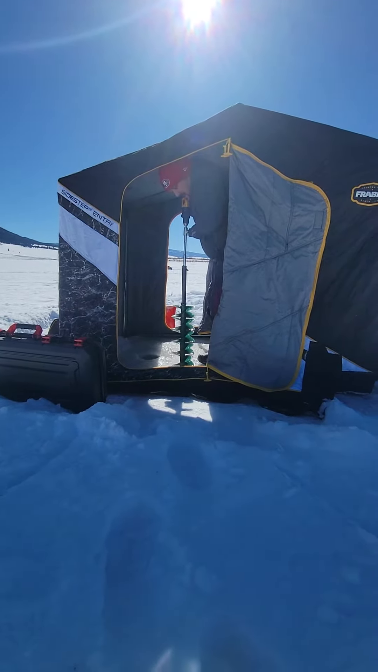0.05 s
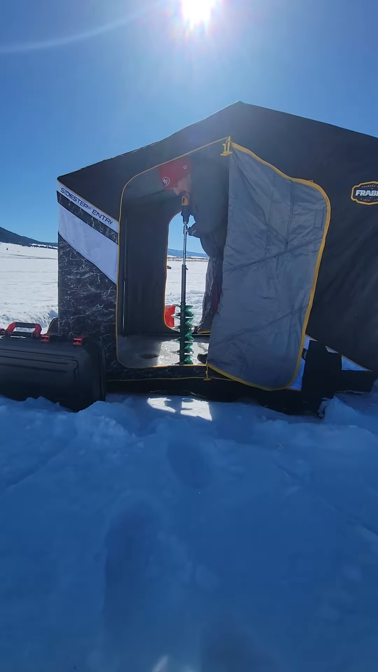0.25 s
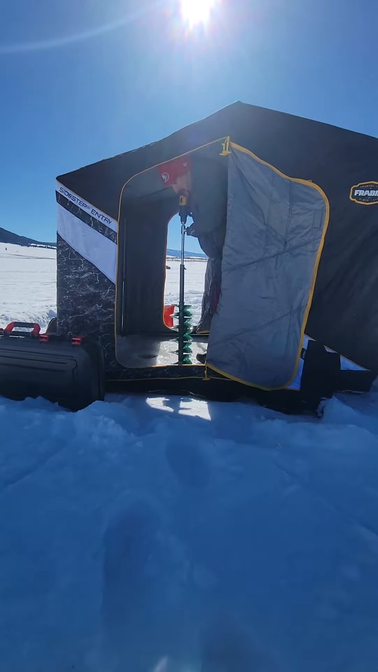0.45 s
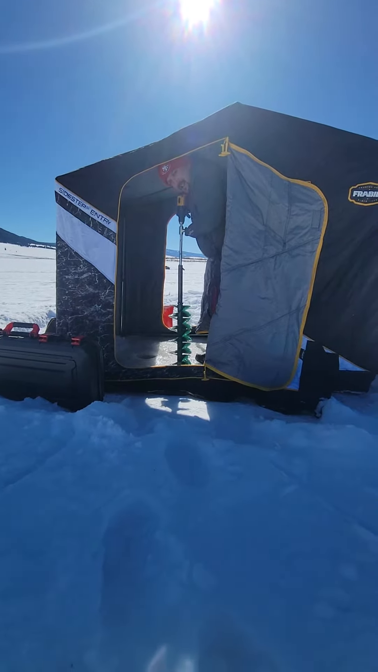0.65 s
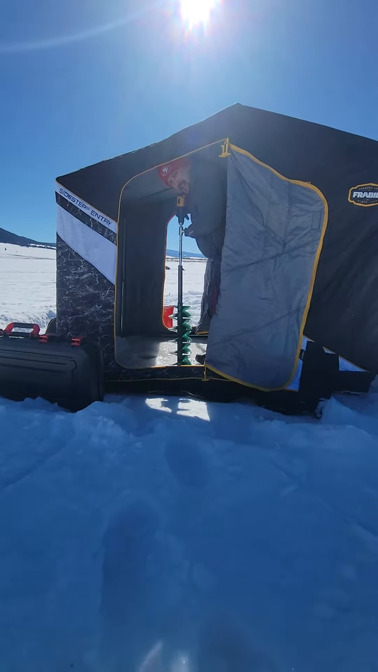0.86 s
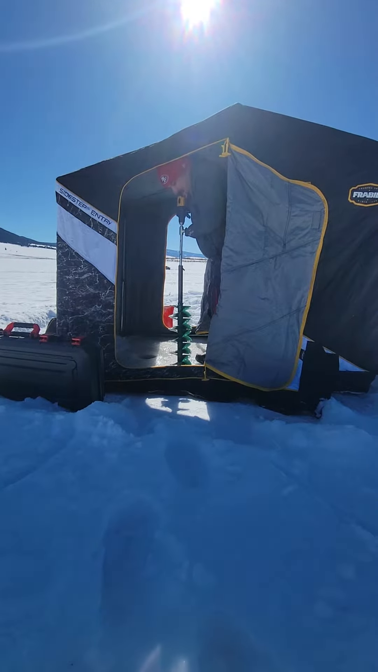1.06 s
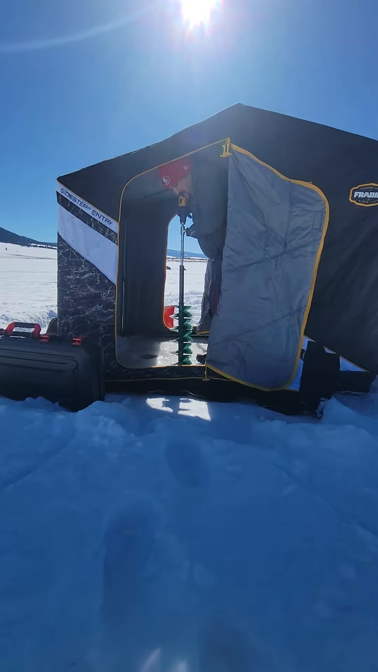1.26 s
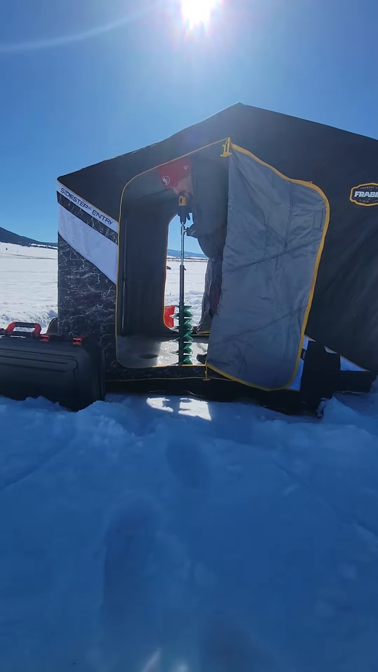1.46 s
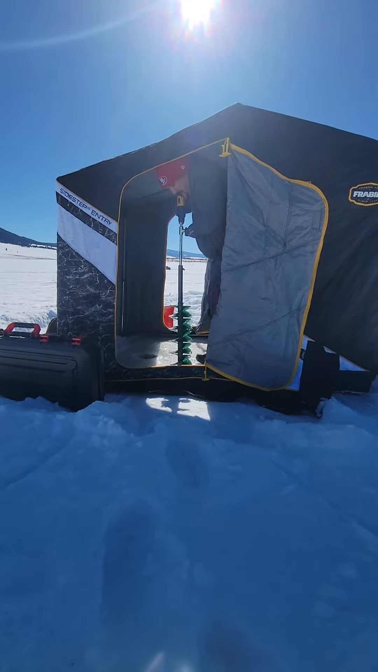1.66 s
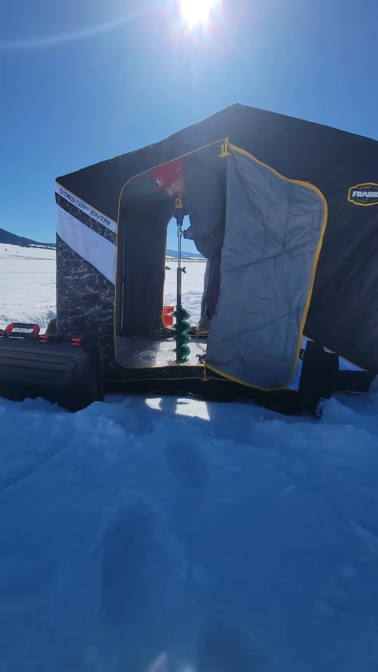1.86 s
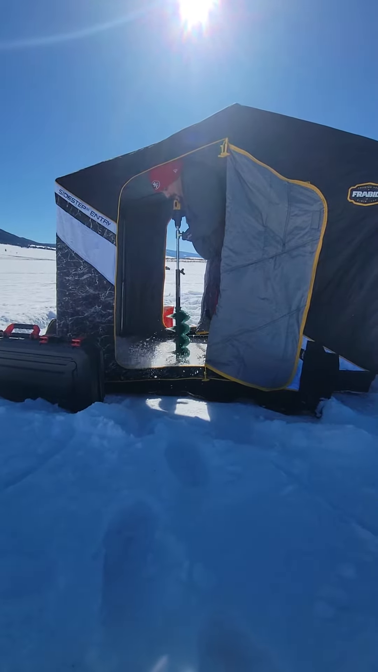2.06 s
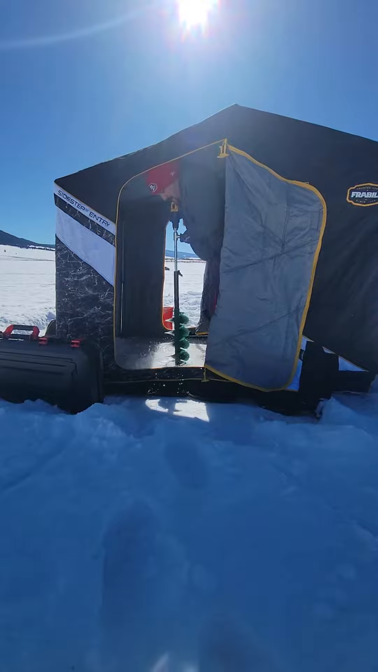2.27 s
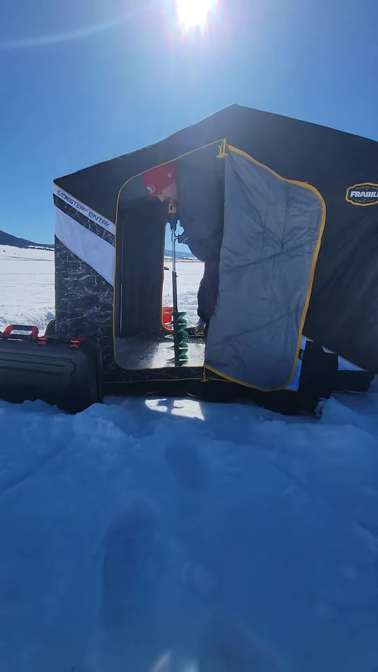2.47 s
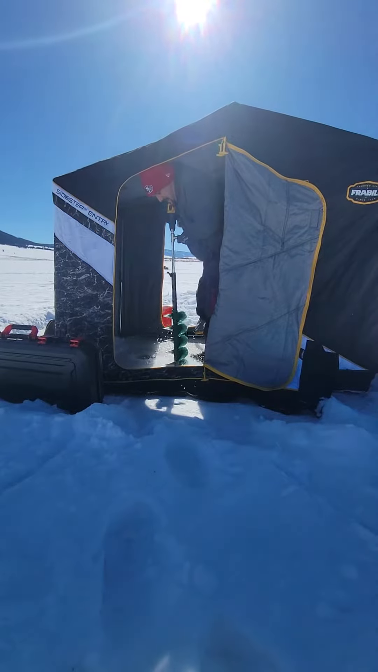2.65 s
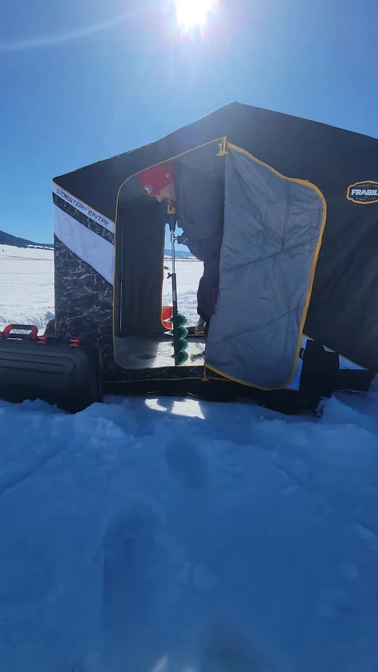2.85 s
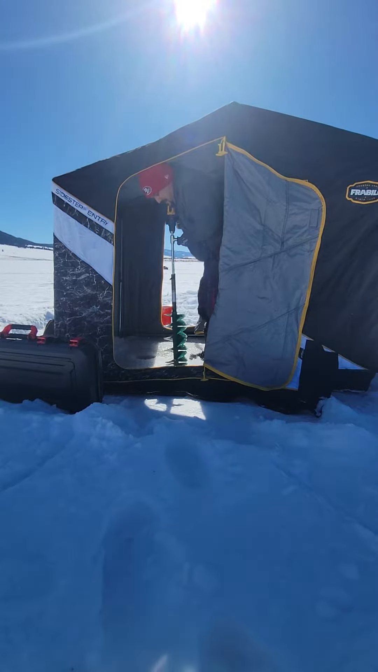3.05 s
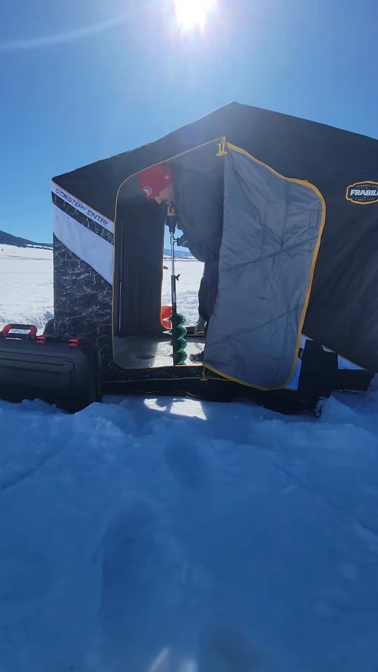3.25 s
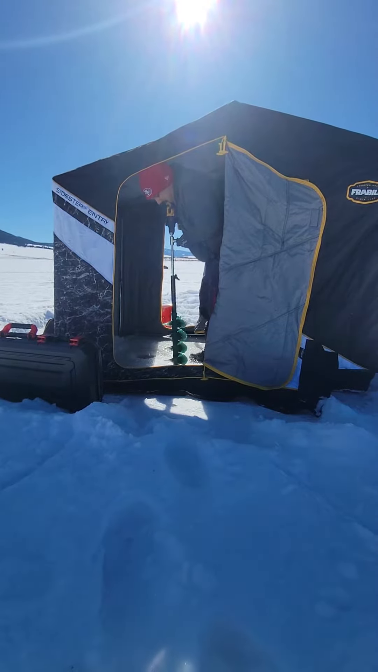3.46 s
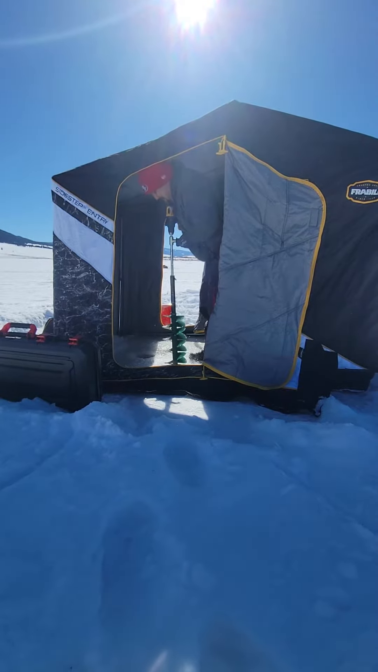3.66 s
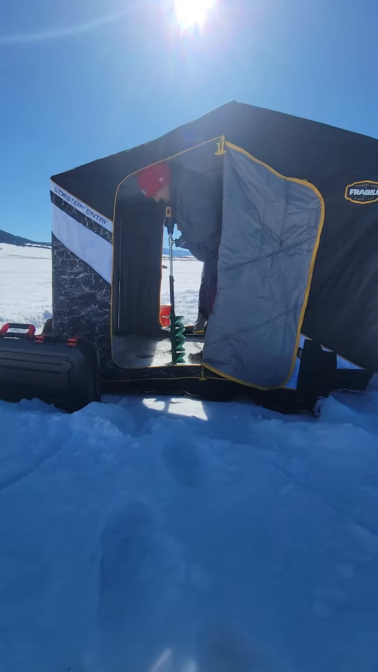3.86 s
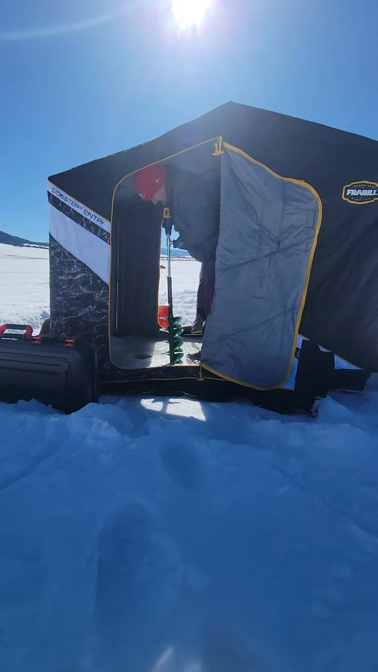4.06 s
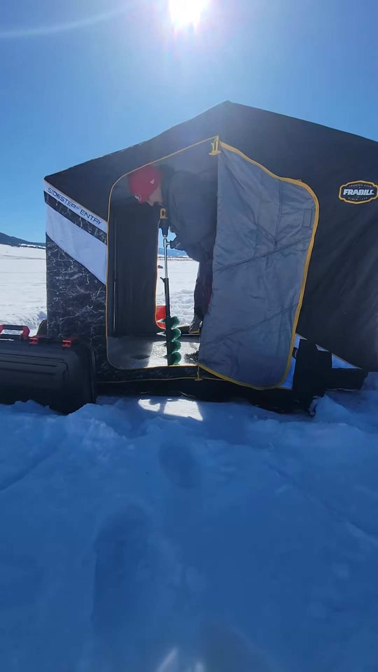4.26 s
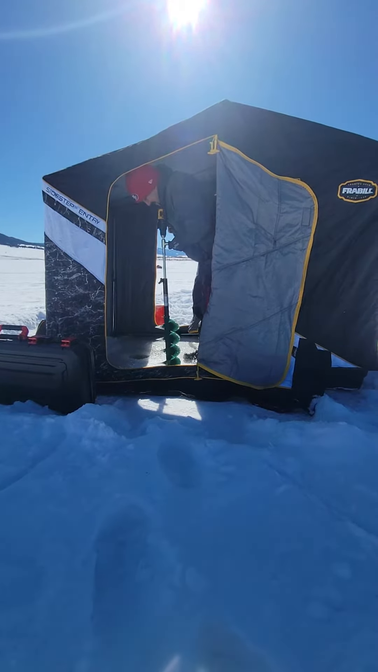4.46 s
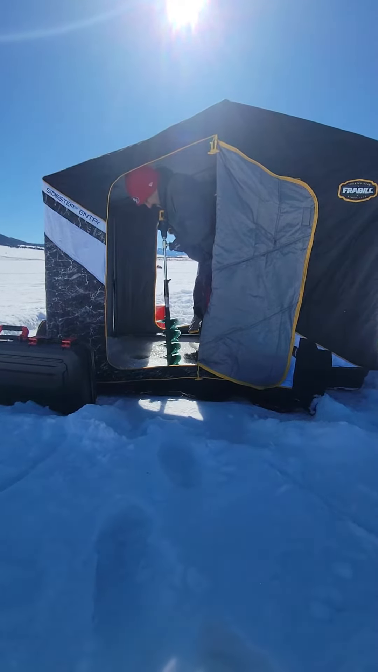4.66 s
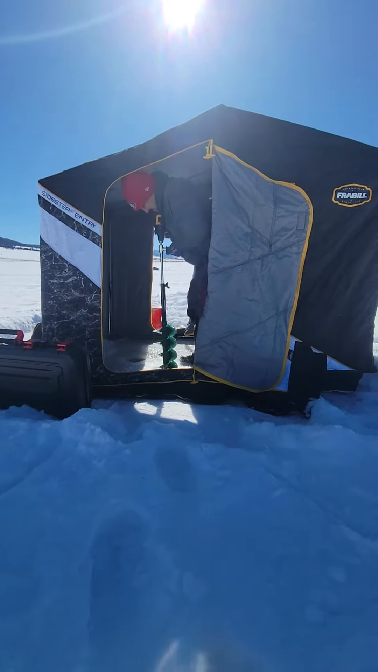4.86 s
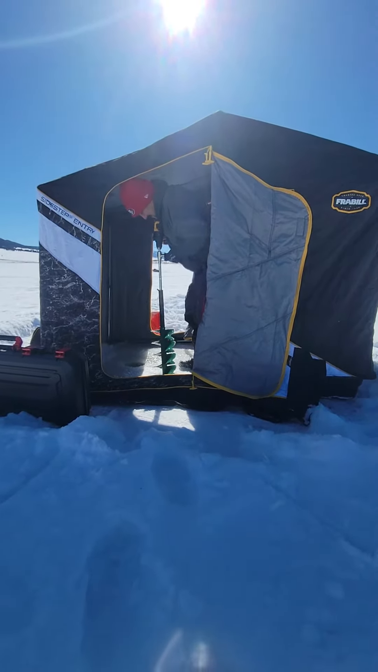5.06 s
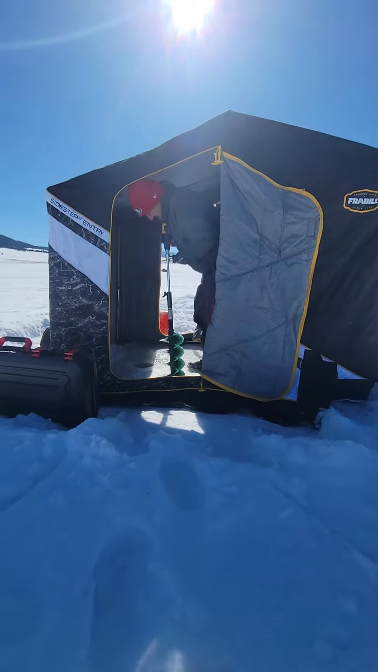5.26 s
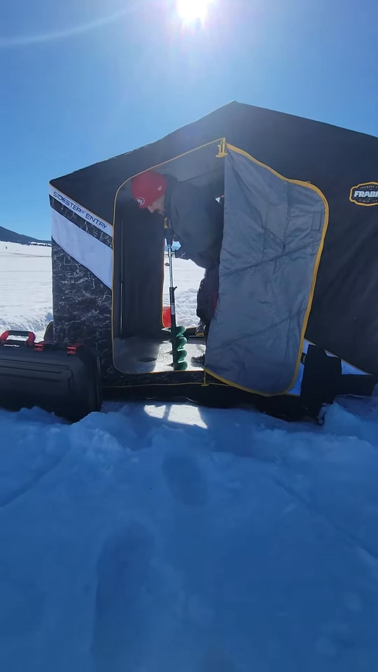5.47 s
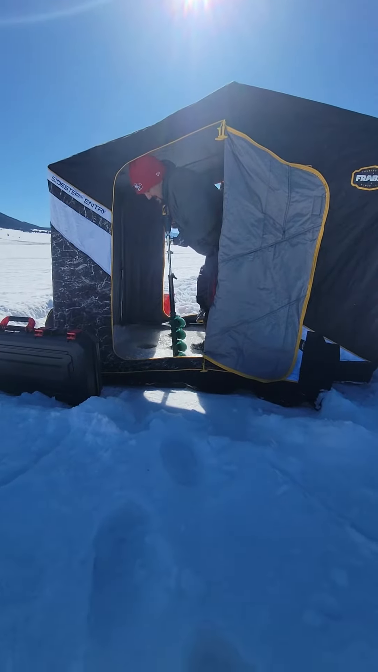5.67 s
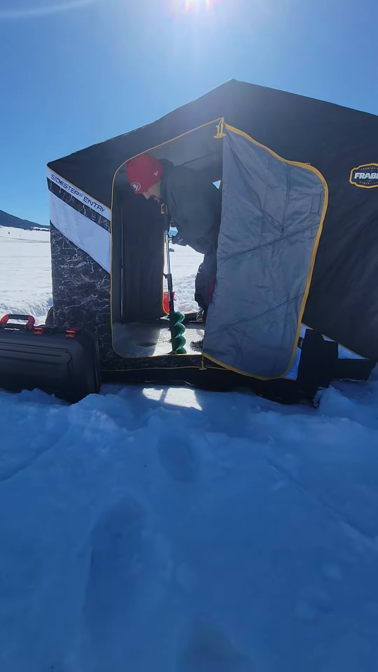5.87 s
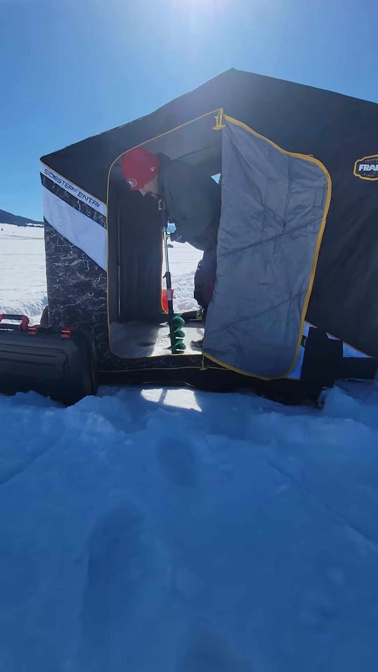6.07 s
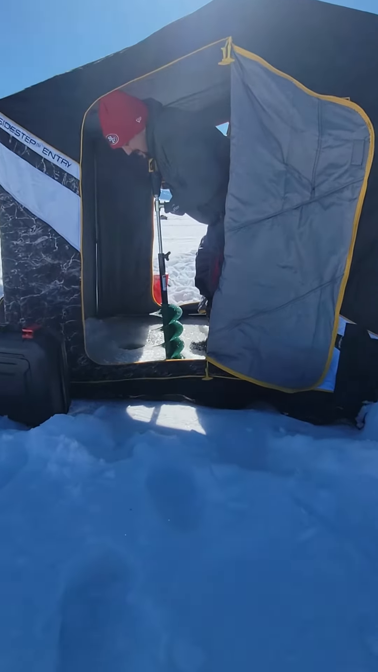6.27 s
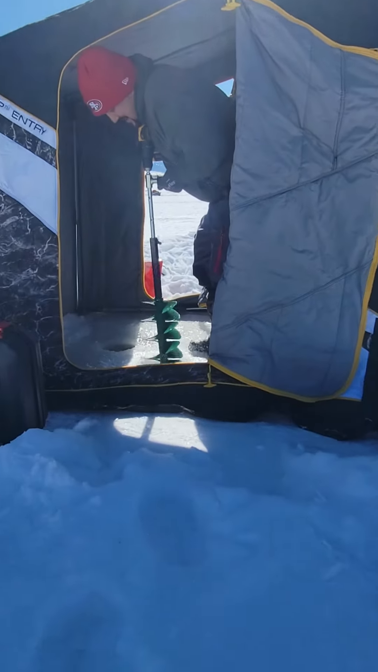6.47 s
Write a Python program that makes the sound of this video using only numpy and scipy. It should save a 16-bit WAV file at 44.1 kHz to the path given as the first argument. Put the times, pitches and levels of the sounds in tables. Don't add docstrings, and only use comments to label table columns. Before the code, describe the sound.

After a second and a half of faint outdoor roar, a drill's gear whine starts and its auger grinds through ice with uneven catches and thuds.

```python
import sys
import numpy as np
from scipy import signal
from scipy.fft import rfft, irfft
from scipy.io import wavfile
from scipy.ndimage import uniform_filter1d

SR = 44100
rng = np.random.default_rng(int(sys.argv[2]) if len(sys.argv) > 2 else 0)


def wrap_up_sound(samples):
    columns = np.atleast_2d(samples).T
    tamed = np.clip(columns, -1, 1)
    steps = np.round(tamed * 32767).astype(np.int16)
    wavfile.write(sys.argv[1], SR, steps)


def to_linear_factor(level_db):
    exponent = np.asarray(level_db, float) / 20
    return 10 ** exponent


N = 287532

TRIGGER_S = 1.569

# start_s [s], pitch_hz [Hz]
TOOTH_RATE = [(1.625, 3700), (1.668, 3250), (1.705, 4900), (1.74, 5010), (1.82, 4230), (1.913, 3690),
              (1.98, 3680), (2.05, 3410), (2.4, 3270), (3.39, 2960), (3.55, 3320), (3.71, 3330),
              (3.85, 3680), (4.14, 3370), (4.3, 2900), (5.03, 2860), (5.12, 2610), (6.05, 2740)]
# start_s [s], speed_lost [share]
STALLS = [(2.444, .04), (2.6, .03), (2.7, .03), (3.228, .06), (4.336, .06), (4.54, .04), (4.75, .05),
          (5.065, .04), (5.123, .03), (5.436, .07), (5.575, .05), (5.7, .06), (5.92, .06), (6.2, .02),
          (6.39, .03), (6.52, .04)]
# tooth_rate_multiple [ratio], level_db [dB], fuzz_width_hz [Hz], fuzz_share [ratio]
TOOTH_LINES = [(.62, 3, 30, .3), (.965, 0, 30, .35), (1.047, 6, 30, .35), (1.02, -19, 160, 3),
               (2, 0, 150, 1.3), (3, -5, 170, 1.2), (4, -4, 200, 1.2), (5, -16, 250, 1.2)]
# pitch_hz [Hz], level_db [dB per Hz]
HOUSING = [(4500, -18), (5300, -8), (5900, -8), (6600, 4), (7300, 0), (7900, -3.5), (8600, -7), (9400, -7),
           (10300, -6.5), (11000, -15.5), (11600, -21), (13000, -28), (15000, -15)]
# start_s [s], level_db [dB]
WHINE = [(1.59, -68), (1.62, -54), (1.67, -46), (1.71, -36), (1.78, -31), (1.86, -30), (1.91, -34),
         (1.96, -43), (2.45, -32), (3.4, -34), (3.6, -32), (3.85, -34), (4.0, -37), (4.2, -34), (4.4, -36),
         (5.2, -39)]
# start_s [s], downward_pressure_db [dB], tooth_clatter_db [dB]
EFFORT = [(1.66, -16, -69), (1.72, -8.5, -54), (1.885, -4, -48), (1.925, -5, -31), (2.1, -3.5, -30),
          (2.4, -2.5, -34), (2.6, 0, -40), (3.39, 1.5, -40), (3.55, -2, -32), (3.72, -5, -33),
          (3.87, -12, -32), (4.13, -2, -32), (4.28, 1, -32), (5.0, -0.5, -29), (5.2, -1, -34),
          (6.5, -1, -33)]
CASE_HZ, CASE_WIDTH_HZ = {.62: 3050, 1.047: 3870}, 170


def gears():
    stalled = sum(lost * bump(s, .022) for s, lost in STALLS)
    tooth_hz = curve(TOOTH_RATE) * (1 - stalled + .003 * wander(39.4))
    turns = np.cumsum(tooth_hz) / SR
    planets = 1 + 0.049 * np.cos(2 * np.pi * turns / 72)
    tooth, overtones = np.zeros((2, N))
    for k, db, width_hz, fuzz in TOOTH_LINES:
        smoother = signal.butter(2, width_hz, fs=SR, output="sos")
        uneven = evened(signal.sosfilt(smoother, rng.standard_normal((2, N))))
        phase = 2 * np.pi * k * turns
        line = to_linear_factor(db) * ((1 + fuzz * uneven[0]) * np.cos(phase) + fuzz * uneven[1] * np.sin(phase))
        if k in CASE_HZ:
            line = line / (1 + ((k * tooth_hz - CASE_HZ[k]) / CASE_WIDTH_HZ) ** 2)
        if k < 2:
            tooth = tooth + line
        else:
            overtones = overtones + line
    squeezed = np.clip((np.arange(N) / SR - TRIGGER_S) / 0.062, 0, 1)
    whine = to_linear_factor(curve(WHINE)) * tooth
    clatter = to_linear_factor(curve(EFFORT, order=2)) * colour(overtones, HOUSING)
    return squeezed * planets * (whine + clatter)


def running():
    t = np.maximum(np.arange(N) / SR - TRIGGER_S, 0)
    return np.minimum(t / .05, 1) * to_linear_factor(-41 * np.exp(-t / .09))


# pitch_hz [Hz], width_hz [Hz], level_db [dB]
AUGER = [(1460, 143, -10.5), (1953, 130, -16.5), (2580, 400, -20), (3097, 93, -11.5), (3816, 370, -8)]
# pitch_hz [Hz], level_db [dB per Hz]
SHAVED_ICE = [(500, -40), (1200, -8.5), (1600, -13), (2000, -4), (2500, -1), (3100, -1.5), (3800, -11),
              (4800, -9.5), (5800, -4), (6600, -3), (7600, -11), (8200, -33.5), (10000, -31)]
# pitch_hz [Hz], level_db [dB per Hz]
CRUSHED_ICE = [(60, -15), (150, -12.5), (330, -22), (500, -6), (800, -1), (1000, -4.5), (1150, -2.5),
               (1400, -6.5), (1700, -23), (2500, -7.5), (4000, -63), (8000, -50)]
# pitch_hz [Hz], level_db [dB per Hz]
FLYING_CHIPS = [(6000, -6.5), (7800, 7.5), (8300, -3), (9300, -8), (10200, -8), (11400, -11), (12500, -2.5),
                (14500, -17), (15600, 1), (15900, -50)]
RASP_DB, CRUSH_DB, CHIPS_DB = -20, -34, -41.5


def blades():
    chatter, cuts = wander(36), grains(5000, 1.8, 1.0)
    pressure, caught, depth = curve(EFFORT), bite(), depth_db()

    ringing = sum(to_linear_factor(db) * evened(resonate(cuts, hz, width)) for hz, width, db in AUGER)
    shaved = evened(colour(cuts, SHAVED_ICE) + to_linear_factor(0.21 * depth) * ringing)
    rasp = to_linear_factor(RASP_DB + 0.46 * pressure + depth + 0.22 * caught + 0.78 * chatter) * shaved

    crushed = colour(grains(1500, 2.2, 0.82), CRUSHED_ICE)
    crush = to_linear_factor(CRUSH_DB + pressure + 1.43 * caught + 0.62 * chatter) * crushed

    flurry = 2.2 * wander(6.2) + 0.36 * chatter
    chips_level = CHIPS_DB + 0.1 * depth + 0.12 * pressure - 0.4 * caught + flurry
    chips = to_linear_factor(chips_level) * colour(grains(5500, 2.4, 0.44), FLYING_CHIPS)
    return rasp + crush + chips


def depth_db():
    sinking_s = np.maximum(np.arange(N) / SR - 2.286, 0)
    return -12.5 * (1 - np.exp(-sinking_s / 1.9))


# start_s [s], thud_db [dB], bite_db [dB]
CATCHES = [(2.247, -49, -1), (2.44, -48, 1.5), (2.558, -48, 1.5), (2.62, -41, -1.5), (2.735, -54, 1),
           (2.873, -41, 1.3), (3.127, -37, 1.4), (3.252, -64, 1), (3.356, -48, 2), (3.605, -55, 1),
           (3.737, -73, 1.5), (4.143, -69, -0.5), (4.261, -40, 1.5), (4.399, -47, 1), (4.59, -41, 1),
           (4.741, -51, 1.5), (4.855, -46, 1), (4.995, -44, 2), (5.141, -48, 2), (5.29, -55, 2.5),
           (5.41, -46, 2.5), (5.567, -45, 3), (5.71, -46, 3), (5.819, -48, 1.8), (5.963, -43, 3),
           (6.163, -51, 1), (6.259, -49, 2), (6.39, -42, 3.1), (6.5, -47, 2.5)]


def bite():
    return sum(db * bump(s, .03) for s, _, db in CATCHES)


def sheet():
    mode_hz, t60_s, hum_db, thud_early_s = 218.5, 0.19, -54, .025
    t, push = np.arange(6000) / SR, np.zeros(N)
    for s, db, _ in CATCHES:
        push[round((s - thud_early_s) * SR)] = to_linear_factor(db)
    swell = (1 - np.exp(-t / 0.0017)) * to_linear_factor(-60 * t / t60_s)
    thuds = signal.oaconvolve(push, swell / swell.max())[:N]
    effort = to_linear_factor(hum_db + 0.2 * curve(EFFORT)) + thuds
    mode = resonate(resonate(rng.standard_normal(N), mode_hz, 26), mode_hz, 26)
    return effort * evened(mode)


# pitch_hz [Hz], width_hz [Hz], level_db [dB]
CHUCK = [(1190, 500, -4.5), (3300, 220, -0.5), (6730, 160, 1.5), (10000, 1200, -30)]


def chuck():
    start_s, level_db, length_s = 1.651, -33.5, 0.028
    t = np.arange(N) / SR - start_s
    shake = np.clip(t / 0.0031, 0, 1) * np.clip(2 - t / length_s * 1.7, 0, 1)
    rattle = sum(to_linear_factor(db) * evened(resonate(rng.standard_normal(N), hz, w)) for hz, w, db in CHUCK)
    return to_linear_factor(level_db) * shake * rattle


# start_s [s], peak_db [dB], pitch_hz [Hz], decay_s [s]
FINGER_BUMPS = [
    (0.882, -40.5, 60, 0.0063),
    (5.322, -40, 70, 0.011),
    (5.799, -23, 87.5, 0.017),
]


def bumps():
    t, out = np.arange(5000) / SR, np.zeros(N)
    for s, db, hz, decay in FINGER_BUMPS:
        turns = hz * (0.3 * t + 0.61 * 0.02 * (1 - np.exp(-t / 0.015)))
        strength = to_linear_factor(db) * t / decay * np.exp(1 - t / decay)
        out[round(s * SR):][:5000] += strength * np.sin(2 * np.pi * turns)
    return out * to_linear_factor([[-5.5], [3.0]])


# pitch_hz [Hz], level_db [dB per Hz]
WIND_PRESSURE = [(20, -2.5), (40, -6), (70, -0.5), (100, -2.5), (140, -23), (250, -16.5), (500, -69)]
# start_s [s], length_s [s], swell_db [dB]
LOW_SWELLS = [
    (.41, 0.2, 8),
    (2.16, 0.33, 10.5),
    (3.2, .2, 9),
    (4.6, 0.088, 7.5),
    (6.103, 0.21, 5.5),
]


def wind():
    a, b = (colour(rng.standard_normal(N), WIND_PRESSURE) * to_linear_factor(3.8 * wander(5.1)) for _ in range(2))
    low_swells = sum(db * bump(s, length) for s, length, db in LOW_SWELLS)
    return to_linear_factor(-59 + 5.0 + low_swells) * np.array([to_linear_factor(-7.5) * (0.51 * a + b), a])


# pitch_hz [Hz], level_db [dB per Hz]
FAR_ROAR = [(110, -12), (180, -26), (300, -5), (560, -3), (800, -1), (1200, -13), (2600, -19),
            (3300, -17.5), (4300, -27.5), (5800, -29), (6850, -19.5), (7600, -35), (8300, -54),
            (15600, -48)]
# start_s [s], peak_db [dB], pitch_hz [Hz]
SNOW_TICKS = [
    (.276, -63, 6360),
    (.888, -57, 4500),
    (.955, -59, 2400),
    (1.264, -63, 5950),
    (1.468, -62, 7000),
    (1.502, -54, 2500),
]
# pitch_hz [Hz], left_right_db [dB], left_lead_rad [rad], likeness [0-1]
LAKE_PORTS = [(150, -4, 10, 0.2), (462, -0.5, -9, 1), (800, -5, -1, 0.23), (2160, -0.5, 1, 0.41),
              (3160, 2, 14.5, 0.22), (4500, -3, 15, 0.35), (6800, 7, 16, 0.58), (9000, -2, -12, .15)]


def lake():
    roar_db, hum_hz, hum_db, moan_db, moan_rise_db = -62, 730, -60.5, -72, 13
    away = .5 + .5 * np.tanh((np.arange(N) / SR - 1.08) / .1)
    noise = colour(rng.standard_normal(N), FAR_ROAR)
    noise = noise + (to_linear_factor(-9 * away) - 1) * resonate(noise, 2120, 1000)
    treble = signal.sosfilt(signal.butter(2, 1200, "high", fs=SR, output="sos"), noise)
    roar = noise + (to_linear_factor(-4.5) - 1) * treble
    out = to_linear_factor(roar_db + 9.5 - 0.53 * away + .3 * wander(2.6)) * roar

    hum = resonate(resonate(rng.standard_normal(N), hum_hz, 260), hum_hz, 260)
    out += to_linear_factor(hum_db) * evened(hum)
    moan = resonate(resonate(rng.standard_normal(N), 320, 110), 385, 160)
    out += to_linear_factor(moan_db + moan_rise_db * away) * evened(moan)

    t = np.arange(400) / SR
    for s, db, hz in SNOW_TICKS:
        puff = rng.standard_normal(400) * np.exp(-t / 0.002)
        tick = evened(resonate(resonate(puff, hz, 1600), hz, 1600))
        out[round(s * SR):][:400] += to_linear_factor(db - 5.0) * tick * 0.78
    return ports(out, LAKE_PORTS, 0, patchy_db=.3)


def ports(x, table, lead_s, patchy_db):
    hz, _, z = signal.stft(x, SR, nperseg=1024, noverlap=768)
    same = np.clip(read(table, hz, order=3), 0, 1)[:, None] ** 1.14
    turned = np.exp(-1j * (read(table, hz, order=2) + 2 * np.pi * hz * lead_s))[:, None]
    scattered = 1.485 * np.exp(2j * np.pi * .5 * drifting(z.shape, bins=4, frames=24))
    share = 1 / (1 + to_linear_factor(-2 * read(table, hz)))[:, None]
    left = np.sqrt(2 * share) + 0 * z
    right = np.sqrt(2 - 2 * share) * (same * turned + np.sqrt(1 - same ** 2) * scattered)
    z = z * to_linear_factor(patchy_db * drifting(z.shape, bins=20, frames=10))
    return signal.istft(z * np.array([left, right]), SR, nperseg=1024, noverlap=768)[1][:, :N]


def drifting(shape, bins, frames):
    field = rng.standard_normal(shape[::-1]).T
    return evened(uniform_filter1d(uniform_filter1d(field, bins, 0), frames, 1))


def grains(per_s, spread_db, bed):
    size = to_linear_factor(spread_db * np.minimum(rng.exponential(1, N), 4))
    cracks = size * (rng.random(N) < per_s / SR) * rng.choice([-1., 1.], N)
    return evened(cracks) + bed * rng.standard_normal(N)


def resonate(x, hz, width):
    turn = np.exp(2j * np.pi * np.cumsum(hz * np.ones(len(x))) / SR)
    r = np.exp(-np.pi * width / SR)
    return 2 * (turn * signal.lfilter([1 - r], [1, -r], x / turn)).real


def colour(x, points):
    gain = to_linear_factor(read(points, np.fft.rfftfreq(N, 1 / SR)))
    return evened(irfft(rfft(x) * gain, N))


def wander(hz):
    return evened(signal.lfilter([1], [1, -np.exp(-2 * np.pi * hz / SR)], rng.standard_normal(N)))


def bump(s, length):
    return np.exp(-.5 * ((np.arange(N) / SR - s) / length) ** 2)


def read(points, hz, order=1):
    table = np.transpose(points)
    return np.interp(np.log(hz + 1), np.log(table[0] + 1), table[order])


def curve(rows, order=1):
    table = np.transpose(rows)
    return np.interp(np.arange(N) / SR, table[0], table[order])


def evened(x):
    return x / np.sqrt(np.mean(x ** 2) + 1e-20)


# pitch_hz [Hz], left_right_db [dB], left_lead_rad [rad], likeness [0-1]
SHELTER_PORTS = [(70, -8, 0, .8), (230, -3, 0, .98), (380, 7, -.2, .6), (550, 0, -1, .88),
                 (900, -1, -.4, .6), (1200, 11, 0, .35), (1400, 1, 0, .6), (1600, 4, .6, .5),
                 (2000, -7, 3, .7), (2700, -5, 3.3, .5), (3900, -4, 7.3, .55), (5000, -1, 5, .5),
                 (7000, -1, 6.1, .7), (9000, 2, 7.3, .5), (15000, 2, 9.5, .2)]


def scene():
    drill = gears() + running() * (blades() + sheet()) + chuck()
    return ports(drill, SHELTER_PORTS, lead_s=.000272, patchy_db=0.34) + lake() + wind() + bumps()


def low_pass(x):
    return signal.sosfilt(signal.butter(12, 16600, fs=SR, output="sos"), x)


def record(dry):
    band_limit = signal.firwin(511, 15960, fs=SR)[None]
    limited = signal.oaconvolve(dry, band_limit, "same")
    return low_pass(limited)


dry = scene()
out = record(dry)
wrap_up_sound(out)
```